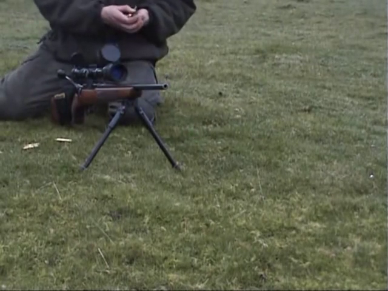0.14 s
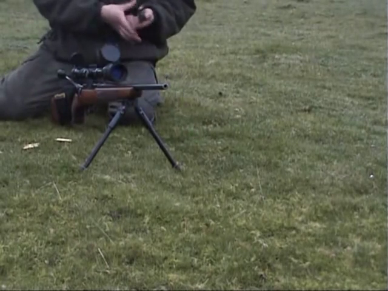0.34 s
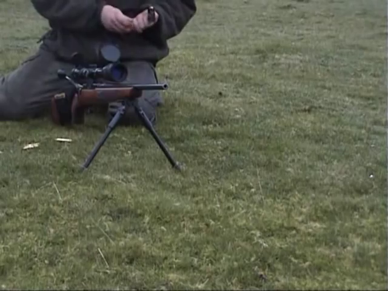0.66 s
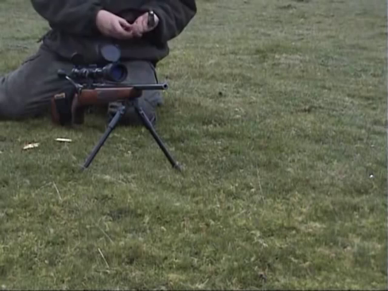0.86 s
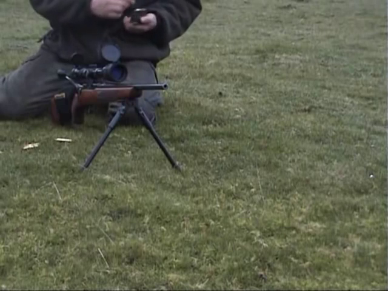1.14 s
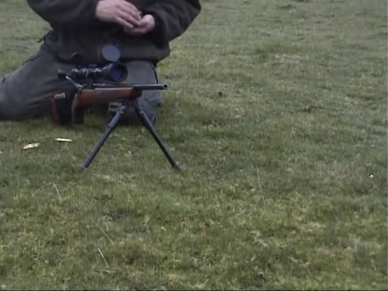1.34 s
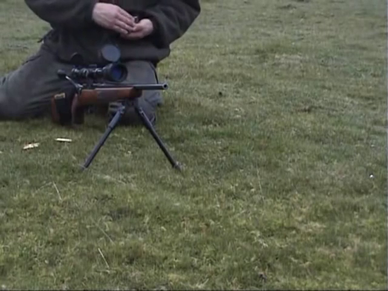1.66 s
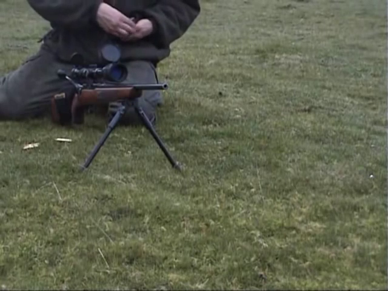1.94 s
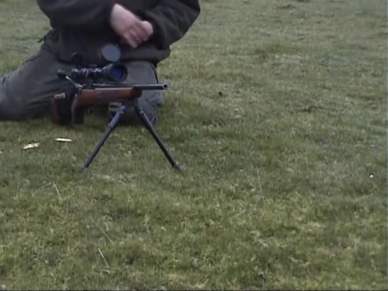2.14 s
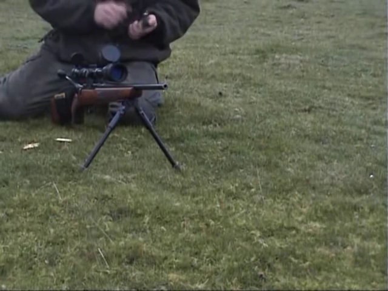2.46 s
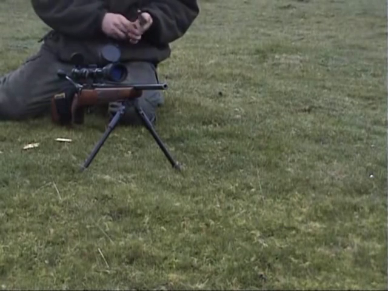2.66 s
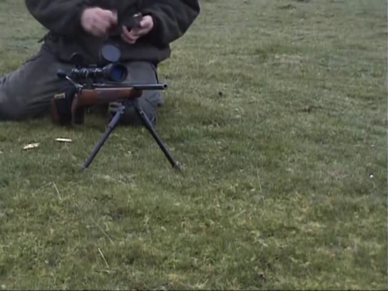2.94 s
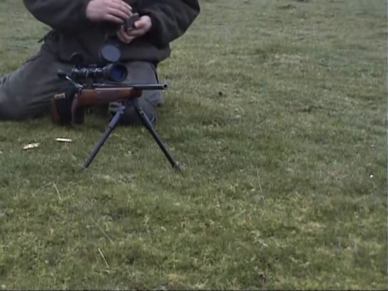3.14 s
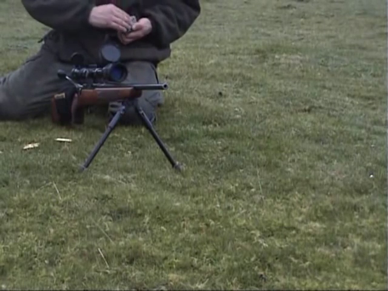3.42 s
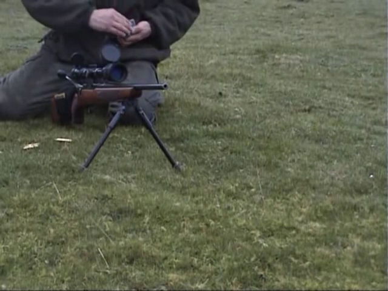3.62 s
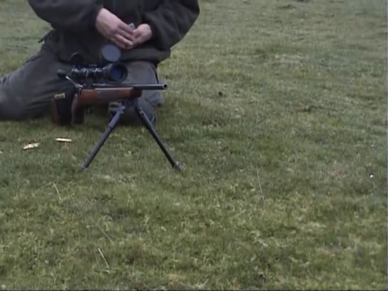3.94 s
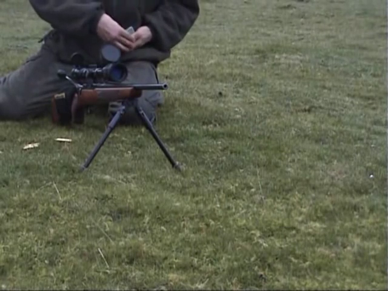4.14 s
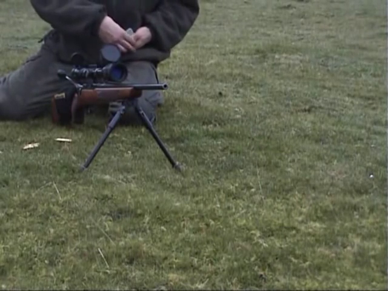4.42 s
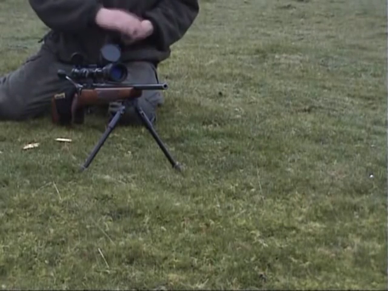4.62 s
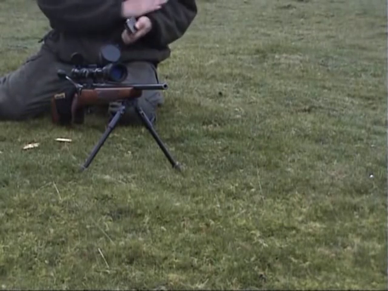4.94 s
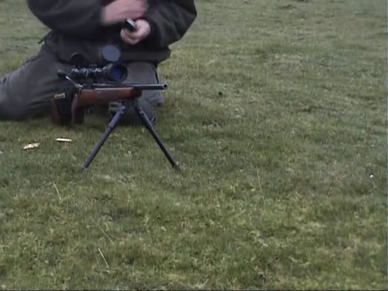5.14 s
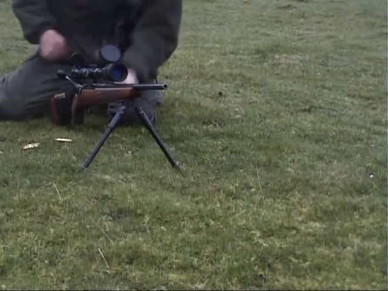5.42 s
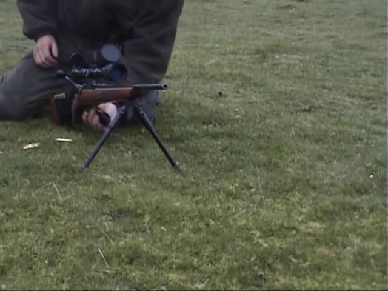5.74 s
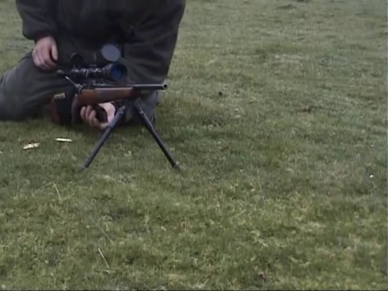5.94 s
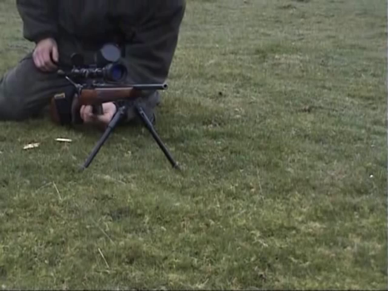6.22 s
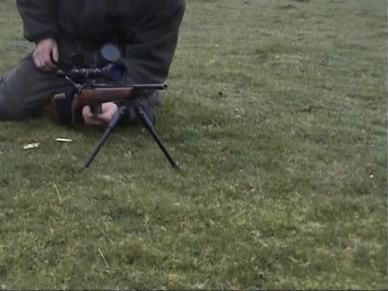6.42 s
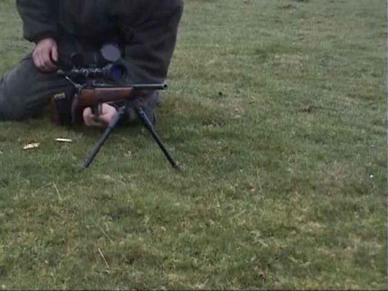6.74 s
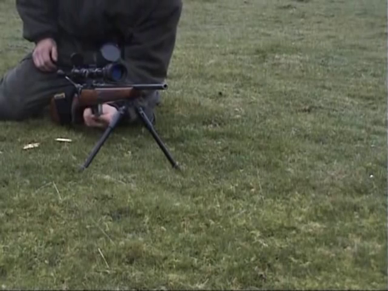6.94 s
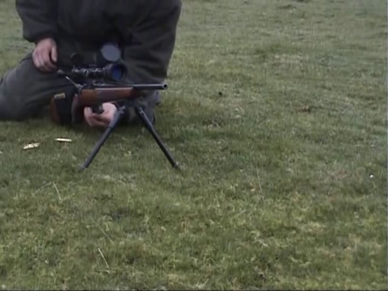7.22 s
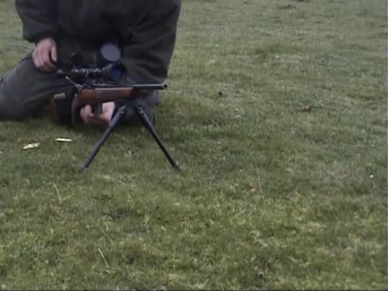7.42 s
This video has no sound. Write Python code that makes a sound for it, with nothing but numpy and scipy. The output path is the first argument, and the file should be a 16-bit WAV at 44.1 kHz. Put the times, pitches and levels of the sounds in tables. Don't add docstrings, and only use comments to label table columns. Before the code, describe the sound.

Small brass and steel snaps of a magazine being loaded, slapped and fitted to a rifle in an open field, with faint whine and distant rumble.

```python
import sys
import numpy as np
from scipy import signal
from scipy.fft import rfft, irfft, next_fast_len
from scipy.io import wavfile
from scipy.ndimage import uniform_filter1d, map_coordinates

SR = 44100
rng = np.random.default_rng(int(sys.argv[2]) if len(sys.argv) > 2 else 0)


def volts_from_db(level):
    exponent = np.asarray(level, float) / 20
    return 10 ** exponent


def wrap_up_sound(samples):
    columns = np.atleast_2d(samples).T
    tamed = np.clip(columns, -1, 1)
    steps = np.round(tamed * 32767).astype(np.int16)
    wavfile.write(sys.argv[1], SR, steps)


N = 334278

# pitch in Hz, width in Hz, level in dB.
LOADING_GRIPS = [
    (0, [(1090, 37, -2), (1760, 60, -2), (2480, 52, 0.5), (2810, 75, 1), (3770, 80, -1.5), (4670, 60, -5), (5660, 84, -15), (6980, 150, -8), (7540, 40, -10), (8030, 200, -10), (9900, 160, -9.5)]),
    (.3, [(770, 100, -5), (1450, 110, 1), (2210, 240, -8), (3400, 170, -2.5), (4300, 120, -4.5), (5800, 160, 0.5), (6440, 86, 1.5), (7650, 150, -4.5), (8950, 230, 0.5), (10130, 120, 1.5), (12000, 230, -2.5)]),
    (1, [(780, 130, -3.5), (1590, 180, -5), (2480, 30, -4), (3640, 60, 0.5), (4700, 140, -10), (6250, 60, -3.5), (7300, 160, -11), (8370, 340, 0), (10040, 82, -6), (12500, 98, -23)]),
    (1.9, [(3140, 300, -3), (4500, 600, 0), (7540, 1800, -11)]),
    (2, [(2070, 1000, -3.5), (3430, 300, 9), (4450, 670, -1), (6640, 270, -14), (8300, 140, 11), (10000, 510, 6), (11700, 380, -10)]),
    (3, [(2700, 200, -3.5), (4100, 270, -4), (7000, 500, -8.5), (8100, 540, -8), (9800, 580, -13)]),
    (3.7, [(2300, 330, -9), (4180, 340, 0.5), (5900, 400, -10), (8600, 1200, -2.5)]),
]
# pitch in Hz, width in Hz, level in dB.
SEATING_GRIPS = [
    (4.2, [(2000, 340, -6), (4210, 240, 0), (4940, 110, -9), (8410, 250, -16)]),
    (4.5, [(2055, 98, -12.5), (5410, 180, -24), (7940, 340, -12), (8400, 230, -12.5), (8960, 160, -16), (10800, 120, -15)]),
    (4.6, [(2396, 110, 0), (4120, 70, 4), (7300, 105, -7), (9440, 220, 0), (10760, 130, -18)]),
    (4.9, [(3645, 710, -4), (6270, 220, 0), (7420, 300, -4.5), (9300, 450, -2), (11800, 560, 0.5), (13000, 290, -7)]),
    (4.99, [(1500, 410, -7), (2350, 100, 0), (2800, 100, -9), (3230, 100, -3), (3710, 89, -4), (4650, 99, -1), (6000, 160, 1.5), (7590, 180, -2), (8630, 360, -5.5), (9700, 83, 1), (10600, 180, -9), (12900, 200, -11)]),
]
# pitch in Hz, width in Hz, level in dB.
FITTING_GRIPS = [
    (5.2, [(2170, 250, -3), (3480, 830, 1), (6000, 290, -9), (8870, 690, 0)]),
    (5.7, [(3240, 200, -3), (5120, 180, -6.5), (5630, 230, -16), (7910, 140, -7), (9060, 110, -9.5), (10650, 130, -7.5)]),
    (6.1, [(1905, 40, -2), (2650, 160, 8), (3140, 280, 2.5), (3660, 270, -0.5), (4350, 300, -18), (5480, 250, -24), (7300, 300, -12), (10000, 98, -23)]),
    (6.9, [(1546, 200, 7.5), (4670, 140, -2), (5950, 400, -5), (6770, 240, -13), (8310, 220, 1.5), (8900, 93, 2), (10570, 120, -8)]),
    (7.3, [(1820, 190, -6), (1290, 69, -5.5), (2320, 150, -12), (2980, 170, -1), (4010, 150, -2), (4500, 180, -2), (4910, 190, -3), (5730, 540, -2), (6880, 200, -6.5), (7870, 430, -3), (11500, 1000, -7)]),
]
GRIPS = LOADING_GRIPS + SEATING_GRIPS + FITTING_GRIPS
# start in seconds, level relative to the case in dB.
HOLLOW_KNOCK = [
    (0, -9),
    (.3, -15),
    (4.2, -13),
    (4.9, -37),
    (4.99, -28),
    (5.7, -25),
    (5.94, -19),
    (6.2, -8),
    (7.3, -16),
]
# time in seconds, case level in dB,
# case pitch in Hz, steel level in dB, loss at the first skip in dB.
SNAPS = [(0.0989, -20, 2600, -15.5, 9), (0.1041, -25, 2900, -20.5, 10), (0.3601, -16, 1360, -10, 11),
         (0.3680, -26, 2400, -19, 20), (1.4134, -25.5, 4560, -16.5, 9), (1.4201, -26.5, 2470, -19.5, 9),
         (2.1084, -26.5, 3260, -24, 16), (2.2212, -27.5, 2240, -26.5, 12), (3.505, -30.5, 2790, -30, 21),
         (4.398, -24.5, 2230, -30, 18), (4.559, -17.5, 2180, -16, 18), (4.6244, -21.5, 2330, -26.5, 15),
         (4.9834, -15.5, 3110, -12, 12), (4.9925, -16, 3720, -1.5, 13.5), (4.9962, -14, 5050, -9, 16),
         (5.366, -25.5, 3340, -42, 13), (5.9, -20, 3330, -20.5, 11), (5.907, -36, 1870, -42, 4),
         (5.95, -33, 3330, -31, 14), (6.1468, -18, 2640, -26.5, 16), (6.3641, -32.5, 1670, -56, 8),
         (7.1096, -32, 1600, -44, 5), (7.4968, -15.5, 2900, -16, 19), (7.4977, -13.5, 4400, -14, 12.5),
         (7.4995, -20, 1860, -23, 7)]
# time in seconds, case level in dB, case pitch in Hz, steel level in dB, knock
# level in dB.
TOUCHES = [(0.0572, -39.5, 2500, -55, -32), (0.0596, -38, 2480, -49, -38), (0.2384, -36, 2440, -41, -44),
           (6.3165, -40, 1750, -42, -60), (1.548, -59, 1500, -44, -47), (1.8037, -35, 4200, -41, -43),
           (1.9628, -45.5, 4530, -33.5, -48), (3.3679, -49, 4360, -32.5, -60),
           (3.3708, -40, 2640, -33, -44.5), (3.4572, -39, 4670, -38, -42), (3.5975, -33.5, 2540, -35, -54),
           (3.6688, -41, 3930, -51, -64), (3.755, -40, 4230, -28, -62), (3.8512, -30, 3630, -52, -58),
           (4.577, -39, 1950, -52, -60), (4.6078, -41.5, 3930, -33, -59), (5.02, -54, 2270, -39, -42),
           (5.4846, -32.5, 3270, -63, -43), (6.992, -68, 4500, -40, -64), (7.0968, -34, 1900, -24, -47),
           (7.1757, -42, 1680, -35, -58), (7.1803, -37, 1840, -45, -44), (7.4325, -44, 1590, -29.5, -62),
           (0.0965, -17.5, 2530, -25.5, -30),
    (1.7248, -37, 1500, -36, -60),
    (1.731, -33, 3680, -31, -40.5),
    (1.7477, -34, 4550, -35, -40),
    (1.7528, -43, 3920, -56, -52),
    (4.9828, -14, 2020, -34, -52),
    (5.8981, -22, 2090, -21, -49),
    (7.1038, -38, 2270, -24, -37),
           (.063, -42, 2520, -59, -40), (.078, -43, 2520, -62, -60), (.244, -42, 2400, -60, -64),
          (.291, -45, 2480, -60, -60), (.296, -45, 2500, -60, -60), (.357, -32, 3450, -27, -30),
          (1.529, -49, 2400, -40, -60), (1.5466, -43, 2310, -55, -52), (1.756, -46, 4000, -46, -50),
          (2.098, -40, 3270, -55, -60), (2.103, -46, 3300, -55, -60), (2.121, -44, 3280, -55, -60),
          (2.245, -47, 2500, -46, -45), (3.378, -49, 2780, -62, -60), (3.5695, -47, 2900, -55, -60),
          (3.602, -44, 2600, -55, -60), (3.623, -44, 2700, -60, -60), (3.641, -45, 2600, -46, -60),
          (3.709, -47, 4100, -50, -60), (3.799, -39.5, 3850, -55, -60), (4.212, -46.5, 2000, -55, -51),
          (4.9807, -22, 1910, -45, -46), (6.16, -40, 3500, -55, -60), (6.1635, -46, 3500, -55, -60),
          (7.101, -43, 2000, -34, -45), (7.184, -39, 2270, -48, -55)]
# start in seconds, length in seconds, case level in dB,
# case pitch in Hz, steel level in dB.
SCRAPES = [
    (0.343, 0.01, -38, 2460, -36),
    (2.201, .015, -35, 2450, -44),
    (4.385, 0.0085, -40, 2240, -41),
    (4.423, 0.0079, -43.5, 2200, -57),
    (5.3175, .008, -42.5, 3480, -35),
    (5.9316, 0.019, -38.5, 2650, -45),
]
# time in seconds, case level in dB, case pitch
# in Hz, # steel level in dB, knock level in dB.
MORE_TOUCHES = [(0.348, -34, 2900, -35, -42), (0.374, -38, 4200, -34, -45), (1.415, -26, 3640, -20, -34),
                (1.4217, -28, 3640, -20, -36), (4.4015, -35, 2000, -55, -55), (5.9015, -21, 3250, -32, -42),
                (5.9518, -29, 3300, -36, -42), (5.9562, -32, 3350, -44, -48), (5.9665, -38, 3300, -58, -60),
                (6.258, -45, 3400, -55, -55), (6.311, -43, 2200, -55, -60), (6.362, -41, 4000, -50, -50),
                (7.1075, -38, 2900, -34, -45), (7.113, -43, 2900, -50, -55), (7.1165, -44, 2200, -55, -55)]
# time in seconds,
# pitch in Hz, level in dB, swell in seconds, time to fall 60 dB in seconds.
RINGS = [
    (0.0968, 2620, -16, .0015, .022),
    (0.0985, 3770, -23, .002, .05),
    (0.1, 1090, -23, .004, .055),
    (0.101, 1770, -31, .003, .04),
    (0.11, 2780, -40, .002, .07),
    (0.3595, 1330, -21, .001, .02),
         (1.415, 2417, -31, 0.0037, 0.056), (2.1072, 4320, -29, .0007, 0.011),
               (4.3968, 4220, -28, 0.0009, 0.019), (4.6267, 4150, -31, .0015, 0.02),
               (4.984, 2370, -28, .003, .08), (4.9925, 4760, -17, .001, 0.023),
               (4.993, 8260, -19, .001, .025), (4.996, 7610, -31, .003, 0.049), (5.9, 515, -40, .002, .03),
               (5.9505, 620, -37, .002, 0.027), (5.9555, 523, -38, .002, 0.035),
               (6.147, 513, -42, .001, 0.03), (6.151, 1910, -39, .002, 0.046), (6.32, 398, -46, .004, .04),
               (6.362, 650, -44, .001, .02), (7.109, 620, -40, .002, 0.028),
               (7.4971, 2944, -19, .001, 0.023), (7.4982, 1880, -21.5, .001, 0.042)]
# time in seconds, level in dB.
THUMPS = [
    (4.9929, -5),
    (7.498, -12.5),
]
# time in seconds, gain in dB.
GAIN_DIP = [
    (5.003, 0),
    (5.006, -7),
    (5.01, -10),
    (5.013, 0),
    (5.03, 0),
]
# time in seconds, song level in dB, grain level in dB.
RUB = [
    (6.235, -70, -71),
    (6.247, -54, -55),
    (6.258, -56, -52),
    (6.278, -53, -56),
    (6.284, -61, -58),
    (6.299, -55, -56),
    (6.308, -64, -51),
    (6.325, -69, -52),
    (6.35, -70, -60),
]
# multiple of the turning rate, left level in dB, right level in dB.
DRUM_ORDERS = [(52, -74, -71), (59, -69, -72), (61, -75, -71), (64, -75, -66), (65, -70, -65),
               (69, -71, -67), (70, -73, -62), (73, -76, -68), (74, -76, -62), (76, -73, -66),
               (78, -85, -63), (79, -76, -66), (80, -64, -70), (81, -73, -69), (82, -79, -67),
               (86, -81, -63), (92, -75, -69), (93, -76, -68), (99, -65, -70), (111, -65, -73),
               (112, -80, -67), (123, -74, -70)]
# multiple of the turning rate, left level in dB, right level in dB.
CAPSTAN_ORDERS = [(6, -73, -72), (12, -66.5, -65.5), (35, -92, -72), (37, -75, -72), (43, -71, -70),
                  (49, -72, -65), (55, -69, -64), (56, -78, -68), (61, -67, -66), (65, -73, -68),
                  (67, -73, -65), (70, -77, -70), (73, -77, -68), (79, -74, -69), (81, -67, -66),
                  (84, -78, -65), (85, -81, -68), (86, -81, -68), (87, -81, -71), (93, -82, -66),
                  (99, -66, -70), (105, -67, -73), (111, -74, -68)]
# pitch in Hz, level in dB.
CASING = [(300, -86.5), (3000, -81), (5000, -76), (8000, -76), (10800, -72.5), (11500, -76.5), (12500, -89)]
# pitch in Hz, level in dB.
HIGH_LINES = [(12925, -100), (13157, -92), (13313, -94), (13598, -84), (13787, -96), (14169, -82),
              (14460, -90), (14750, -99), (15622, -93)]
# frequency in Hz, level in dB per Hz.
HISS = [(300, -30), (450, 1), (1150, 2), (1370, -3), (1860, -1.5), (2740, -7), (4300, -7), (5300, -1.5),
        (5800, -4), (7960, -2.5), (10800, -15), (12350, -8), (12500, -31), (14900, -9), (15100, -70)]
# frequency in Hz, level in dB per Hz.
RUMBLE = [(12, -61), (20, -27), (40, -9), (71, -2.5), (107, -6.5), (136, -2.5), (172, -9), (211, -6.5),
          (250, -1), (307, -3.5), (411, -3.5), (492, -16), (550, -27), (720, -52), (1210, -120)]
# time in seconds, drone level in dB, traffic level in dB.
FAR_SWELLS = [
    (0.0, -52, -60),
    (1.37, -75, -59),
    (1.56, -62, -57),
    (1.98, -65, -59),
    (3.67, -55, -57.5),
    (5.55, -67.5, -59.5),
    (6.97, -55, -59.5),
    (7.35, -71, -59),
    (7.58, -68, -61.5),
]
# frequency in Hz, likeness from -1 to 1.
ALIKE = [(60, 0.99), (130, 0.53), (290, 0.71), (600, -0.38), (1200, 0.1), (2700, 0.17), (4200, 0.78),
         (6800, 0.82), (9800, -0.063), (12000, -0.66)]
# frequency in Hz, left minus right in dB.
LEAN = [(100, -1), (1000, -0.5), (4000, -1.5), (10000, -11.5)]


def unit(x):
    return x / np.sqrt(np.mean(x ** 2) + 1e-20)


def along(points, hz):
    f, v = np.transpose(points)
    return np.interp(np.log(hz + 1), np.log(f + 1), v)


def curves(rows):
    s, *cols = np.transpose(rows)
    return [np.interp(np.arange(N) / SR, s, c) for c in cols]


def wobble(rate):
    knots = rng.standard_normal(int(N * rate / SR) + 4)
    return map_coordinates(knots, [np.arange(N) * rate / SR])


def filtered(x, response):
    m = next_fast_len(x.shape[-1] + 4096)
    return irfft(rfft(x, m) * response(np.fft.rfftfreq(m, 1 / SR)), m)[..., :x.shape[-1]]


def resonances(modes, damping_hz=0):
    def response(f):
        total = 0
        for k, (center, width, db) in enumerate(modes):
            loss = 1j * f * (width + damping_hz)
            total = total + (-1) ** k * volts_from_db(db) * loss / (center * center - f * f + loss)
        return total
    return response


def rush(spectrum, patchy_db):
    z = signal.stft(rng.standard_normal((2, N)), nperseg=512)[2]
    patches = uniform_filter1d(rng.standard_normal(z.shape[1:]), size=6, axis=0)
    patches = uniform_filter1d(patches, size=14, axis=1)
    pair = signal.istft(z * volts_from_db(patchy_db * unit(patches)), nperseg=512)[1][:, :N]

    def share(hz):
        angle = np.arccos(np.clip(along(ALIKE, hz), -1, 1)) / 2
        return volts_from_db(along(spectrum, hz)) * [np.cos(angle), np.sin(angle)]

    mid, side = filtered(pair, share)
    lean = lambda hz: volts_from_db(along(LEAN, hz) * np.array([[.5], [-.5]]))
    return unit(filtered(np.array([mid + side, mid - side]), lean))


def motor(hz, strong, weak_db):
    order = np.arange(1, int(15000 / hz))
    db = along(CASING, order * hz) + weak_db + 5 * rng.standard_normal((2, len(order)))
    for multiple, *sides in strong:
        db[:, round(multiple) - 1] = sides
    size = 4096
    phase = np.exp(2j * np.pi * rng.random(db.shape))
    apart = np.arccos(along(ALIKE, order * hz))
    phase[1] = phase[0] * np.exp(1j * apart + .3j * rng.standard_normal(len(order)))
    turn = irfft(np.pad(volts_from_db(db) * phase, ((0, 0), (1, 0))), size) * size / np.sqrt(2)
    angle = (np.arange(N) / SR * hz + 0.00035 * wobble(3.11)) % 1
    return np.array([np.interp(angle * size, np.arange(size), side, period=size) for side in turn])


def camera():
    whine = motor(95.73, DRUM_ORDERS, weak_db=-4.0)
    whine = whine + motor(96.02, CAPSTAN_ORDERS, weak_db=0.5)
    whine = whine + motor(324.55, [], weak_db=0.0)
    t = np.arange(N) / SR
    high_tones = sum(volts_from_db(db + 8 + 2.5 * wobble(12)) * np.sin(2 * np.pi * hz * t) for hz, db in HIGH_LINES)
    hiss = volts_from_db(-51) * rush(HISS, patchy_db=2.03)
    return high_tones + whine * volts_from_db(0.82 * wobble(15)) + hiss


def far():
    drone_db, traffic_db = curves(FAR_SWELLS)
    pitch_hz = 76.5 + 2.27 * wobble(3.0)
    turn = 2 * np.pi * np.cumsum(pitch_hz) / SR
    drone = np.sqrt(2) * volts_from_db(drone_db - 1.5 + 1.0 * wobble(9)) * np.sin(turn)
    octave = volts_from_db(drone_db - 12.5 + 3.5 * wobble(5.6)) * np.sin(2 * turn)
    traffic = volts_from_db(traffic_db + 3.5 + 0.6 * wobble(5.6)) * rush(RUMBLE, patchy_db=1.7)
    return drone + octave + traffic


def snaps():
    rows, starts = [], [start for start, _ in HOLLOW_KNOCK]
    for s, case_db, case_hz, steel_db, loss_db in SNAPS:
        knock_db = case_db + HOLLOW_KNOCK[np.searchsorted(starts, s) - 1][1]
        rows.append((s, case_db, case_hz, steel_db, knock_db))
        for k, (late, off) in enumerate(rng.standard_normal((3, 2)), start=1):
            lost_db = loss_db * k ** 0.5
            skip_s = s + .003 * (k + .2 * late)
            skip_hz = case_hz * np.exp(0.047 * off)
            rows.append((skip_s, case_db - lost_db, skip_hz, steel_db - 1.18 * lost_db, knock_db - lost_db))
    return rows


def scrapes():
    rows = []
    for s, length, case_db, case_hz, steel_db in SCRAPES:
        for u, (off, size) in zip(np.linspace(0, 1, num=4), rng.standard_normal((4, 2))):
            more_db = 2.5 * (u - .5) + 2.5 * size
            slip_hz = case_hz * np.exp(0.047 * off)
            slip_db = case_db + more_db
            rows.append((s + u * length, slip_db, slip_hz, steel_db + more_db, slip_db - 12))
    return rows


def chatter(t, rise, t60, tail_db, tail_t60):
    envelope = (1 - np.exp(-t / rise)) * (volts_from_db(-60 * t / t60) + volts_from_db(tail_db - 60 * t / tail_t60))
    rattle = rng.standard_normal((3, 2, len(t))) * envelope
    for _ in range(6):
        z = rfft(rattle)
        rattle = irfft(z / np.abs(z), len(t)) * envelope
    return rfft(rattle)


def swing(pair):
    envelope = uniform_filter1d(2 * pair[0] ** 2, size=30)
    longest_lead = round(.0009 * SR)
    return pair / np.sqrt(envelope.max()), min(envelope.argmax(), longest_lead)


def contacts():
    size = 2048
    out, t, f = np.zeros((2, N + SR)), np.arange(size) / SR, np.fft.rfftfreq(size, 1 / SR)
    above = lambda hz: (1j * f / (hz + 1j * f)) ** 2
    below = lambda hz: 1 / (1 + (1j * f / hz) ** 2 + 1.4j * f / hz)
    starts = [start for start, _ in GRIPS]
    bodies = [resonances(modes, damping_hz=80)(f) for _, modes in GRIPS]
    hollow = resonances([(800, 250, -4), (1250, 400, 0)])(f) * above(350)
    touches = TOUCHES + snaps() + scrapes() + MORE_TOUCHES
    for s, case_db, case_hz, steel_db, knock_db in touches:
        body = bodies[np.searchsorted(starts, s) - 1]
        body = body / np.abs(body).max()
        reach = volts_from_db(np.clip(.45 * (case_db + 17.0), -13, 0))
        case = resonances([(case_hz, 257 + 300 * reach, 0)])(f) ** 2
        dull = (1 - 0.4 * reach) * case + reach * body * above(770) + volts_from_db(-16.5) * above(1200)
        dull = dull * below(5600) ** 2
        steel = (body + volts_from_db(-17)) * above(3930) * below(13150) ** 4
        crack = chatter(t, rise=.0002, t60=.016, tail_db=-9.5, tail_t60=.06)
        parts = irfft(crack * np.array([dull, steel, hollow])[:, None], size)
        for db, part in zip([case_db, steel_db, knock_db], parts):
            pair, lead = swing(part)
            out[:, round(s * SR) - lead:][:, :size] += volts_from_db(db) * pair * volts_from_db([[0], [-12]])
    mid, side = filtered(out[:, :N], lambda hz: 1 / (1 + (hz / 13700) ** 24))
    return np.array([mid + side, mid - side]) * volts_from_db([[-.7], [.7]])


def rings():
    out, t = np.zeros(N + SR), np.arange(SR // 10) / SR
    rows = RINGS
    for (s, hz, db, swell, t60), turn in zip(rows, rng.random(len(rows))):
        fade = volts_from_db(db - 60 * t / t60) * (1 - np.exp(-t / swell))
        out[round(s * SR):][:len(t)] += fade * np.sin(2 * np.pi * (hz * t + turn))
    return out[:N] * volts_from_db(2.5 * wobble(300))


def thumps():
    push, u = np.zeros(N), np.arange(400) / SR / 0.00023
    for s, db in THUMPS:
        push[round(s * SR):][:len(u)] += volts_from_db(db) * u * np.exp(-u)
    return push * np.array([[1], [-.3]])


def rub():
    song_db, grains_db = curves([(0, -120, -120), *RUB, (RUB[-1][0] + .02, -120, -120)])
    song_hz = 1086 + 25 * wobble(90)
    song = np.sqrt(2) * np.sin(2 * np.pi * np.cumsum(song_hz) / SR) * volts_from_db(2.0 * wobble(110))
    grains = rng.standard_normal(N) * volts_from_db(3.7 * wobble(400))
    cloth = resonances([(1750, 600, 2), (3220, 1600, -5)])
    grains = unit(filtered(grains, lambda hz: cloth(hz) / (1 + (hz / 5000) ** 8)))
    return volts_from_db(song_db) * song + volts_from_db(grains_db) * grains


def scene():
    return camera() + far() + contacts() + rings() + rub()


def top_cut(x):
    return signal.sosfilt(signal.butter(12, 16810, fs=SR, output="sos"), x)


def record(dry):
    clipped = np.clip(dry + thumps(), -.8, .8)
    wet = clipped * volts_from_db(curves(GAIN_DIP)[0])
    mix = filtered(wet, lambda hz: 1 / (1 + (hz / 16500) ** 40))
    return top_cut(mix)


dry = scene()
out = record(dry)
wrap_up_sound(out)
```